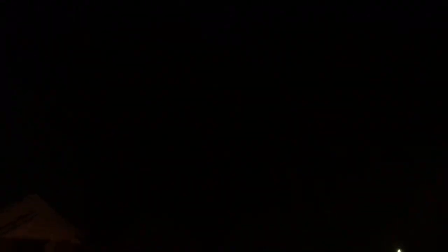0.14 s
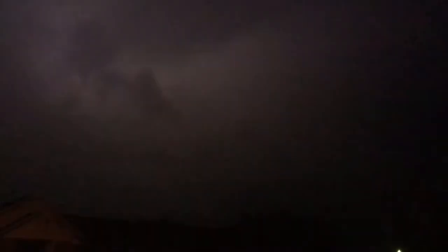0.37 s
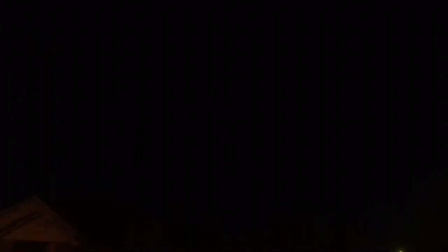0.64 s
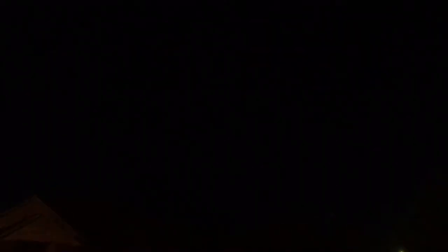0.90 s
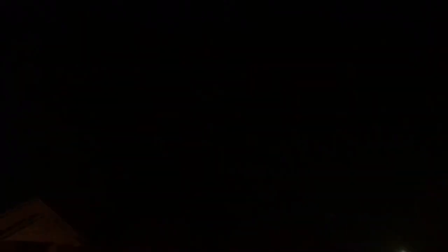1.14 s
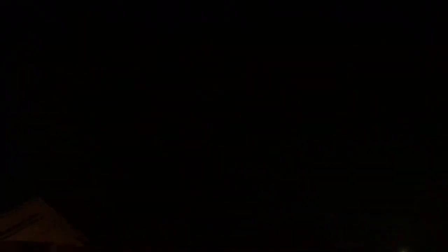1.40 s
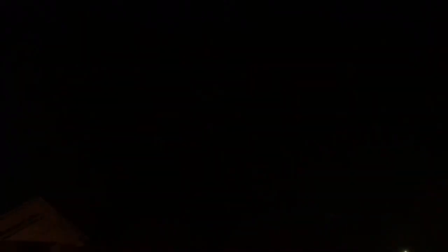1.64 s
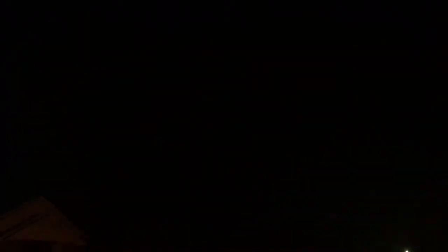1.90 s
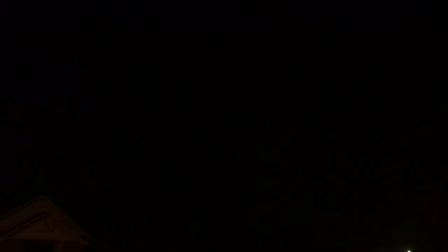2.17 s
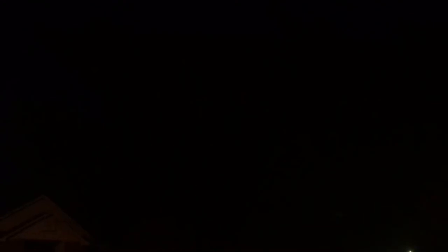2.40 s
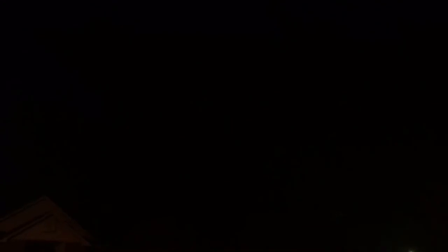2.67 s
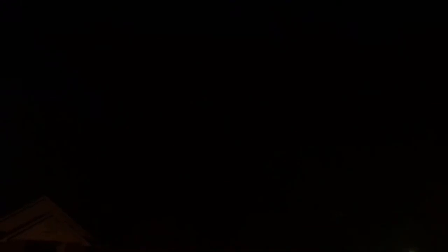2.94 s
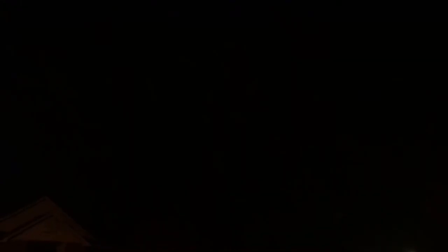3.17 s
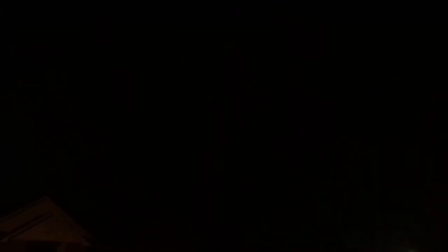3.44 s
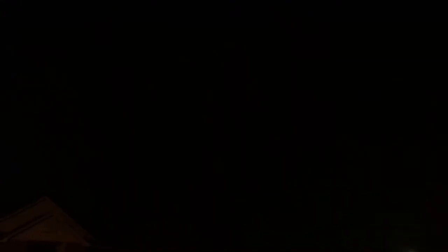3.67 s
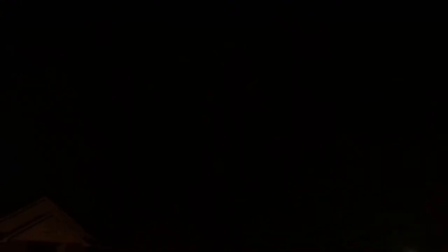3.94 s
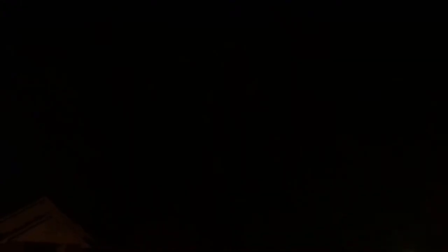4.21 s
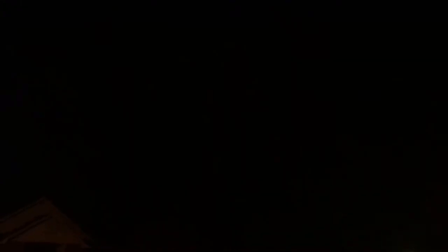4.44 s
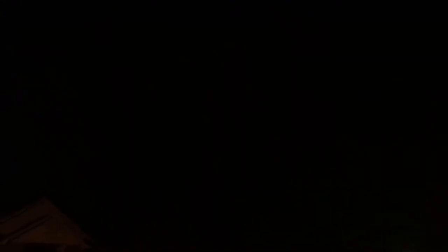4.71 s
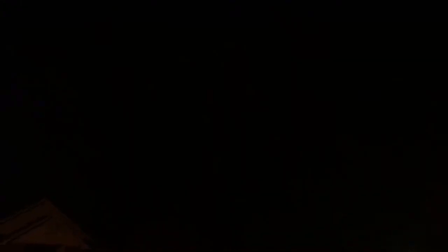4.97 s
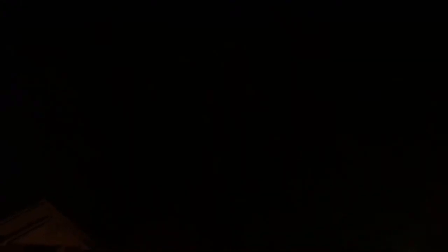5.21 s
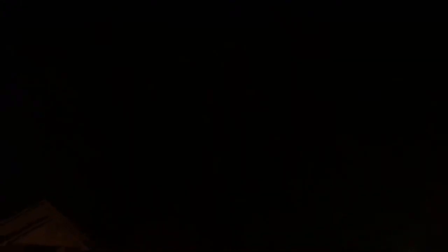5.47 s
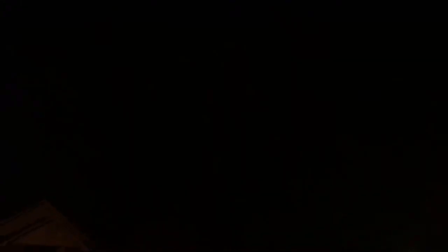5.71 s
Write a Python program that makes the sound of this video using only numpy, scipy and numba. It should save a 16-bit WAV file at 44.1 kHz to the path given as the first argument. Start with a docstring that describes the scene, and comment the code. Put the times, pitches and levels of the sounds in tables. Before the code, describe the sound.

Heard from under a porch at night, low thunder rolls without pause, made of many overlapping blunt thumps. It begins in uneven knocks, swells strongest around 3.6 seconds, then eases and lumps up again near 5.5. Beneath it lies faint rain hiss. Small drops tick close by, a big one strikes a gutter near 0.8 seconds with a short ring and splash, and tiny bubbles plink. Mono microphone, little deepest bass.

```python
"""Night thunder over light rain

Far thunder rolls over light rain, heard from under a porch roof.
Blunt shock waves from all along the bolt pile up into a rumble that the porch rings with.
A low tone wavers inside it; bands of hiss make the far rain and the thunder's airy upper fringe.
Small drops tick as noise and damped sines, and bubbles plink in a puddle as pure ringing notes.
A few big drops strike a gutter, ring its modes and splash; soft spatters gush off the roof."""
import sys
import numpy as np
from scipy import signal
from scipy.fft import rfft, irfft
from scipy.io import wavfile
from scipy.ndimage import uniform_filter1d
from numba import njit

SR = 44100
rng = np.random.default_rng(int(sys.argv[2]) if len(sys.argv) > 2 else 0)


def volts_from_db(level):
    """Convert decibel levels to linear amplitude ratios."""
    exponent = np.asarray(level, float) / 20
    return 10 ** exponent


def unload_audio(sound):
    """Save the sound as a 16-bit wav file, at the path given as the first command line argument."""
    columns = np.transpose(np.atleast_2d(sound))
    # keep every value between -1 and 1, then stretch to whole-number steps
    steps = np.round(np.clip(columns, -1, 1) * 32767)
    wavfile.write(sys.argv[1], SR, steps.astype(np.int16))


N = 257984
HZ = np.maximum(np.arange(N // 2 + 1) * SR / N, 1)  # frequency of every spectrum bin


def unit(x):
    """Scaled to rms 1."""
    return x / np.sqrt(np.mean(x ** 2))


def curves(table):
    """Every column of a table after the first (time), drawn as a line sample by sample."""
    seconds, *columns = np.transpose(table)
    return [np.interp(np.arange(N) / SR, seconds, column) for column in columns]


def filtered(x, gain):
    """Sound with its spectrum multiplied by a gain."""
    return irfft(rfft(x) * gain, N)


def shape(points):
    """Gain at every frequency, from points of frequency and level in dB."""
    hz, db = np.transpose(points)
    return volts_from_db(np.interp(np.log(HZ), np.log(hz), db))


def band(centre_hz, octaves):
    """Bell-shaped gain around a centre; octaves is its standard deviation."""
    return np.exp(-.5 * (np.log2(HZ / centre_hz) / octaves) ** 2)


def peaks(table):
    """Gain at every frequency from resonances or dips of given centre, width and dB."""
    gain = 1
    for hz, width_hz, db in table:
        bump = 1 / (1 + (2 * (HZ - hz) / width_hz) ** 2)
        gain = gain * (1 + (volts_from_db(db) - 1) * bump)
    return gain


def walk(rate_hz):
    """Smooth random curve of rms 1: held steps, averaged twice over a step's length."""
    hold = int(SR / rate_hz)
    steps = np.repeat(rng.standard_normal(N // hold + 1), hold)
    return unit(uniform_filter1d(uniform_filter1d(steps, hold), hold)[:N])


@njit
def rings(n, start, hz, t60, gain):
    """Damped sines, one per row, each stopped once it has fallen 60 dB."""
    out = np.zeros(n)
    for k in range(len(start)):
        phasor = gain[k] + 0j
        turn = np.exp((2j * np.pi * hz[k] - np.log(1000) / t60[k]) / SR)
        for i in range(start[k], min(n, start[k] + int(t60[k] * SR))):
            out[i] += phasor.imag
            phasor *= turn
    return out


def bursts(seconds, db, t60):
    """Noise that starts at once and fades for at most half a second, one burst per row."""
    envelope, noise = np.zeros(N), rng.standard_normal(N)
    for s, start_db, fade_s in zip(seconds, db, t60):
        start = int(s * SR)
        age = np.arange(N - start)[:SR // 2] / SR
        envelope[start:][:len(age)] += volts_from_db(start_db - 60 * age / max(fade_s, .002))
    return envelope * noise


# the roll as a whole; nearer stretches of the bolt are brighter:
# time_s, loudness_db, brightness_db_per_octave
ROLL = [(0, -3.5, 3), (.3, -2.5, 1), (.65, -4, 1), (.8, -2.5, 1), (1.3, -3, 0), (1.7, -0.5, 2),
        (2.3, 1.5, 0.5), (2.7, -2.5, 1), (3.2, 2, 0.5), (3.6, 5.5, -0.5), (4.0, 3.5, 0), (4.6, 0.5, 0),
        (5.2, -0.5, 0), (5.55, -1, 1), (5.85, 0.5, 0.5)]
# sizes of wave, deepest to smallest: centre_hz, level_db, random_swell_db
WAVE_SIZES = [(50, -49.5, -0.5), (90, -42, 1), (150, -44.5, 1.5), (222, -52.5, 1.5), (310, -57, 2.14),
              (420, -61, 2), (676, -64, 1.5)]
# peals that stand out of the roll: peak_s, lift_db, wave_hz, rise_and_fall_s
PEALS = [(0.089, 8.5, 150, 0.013), (0.04, 4, 367, 0.062), (0.342, 12, 268, 0.035), (0.705, 9, 373, 0.038),
         (0.964, 5, 358, 0.046), (0.346, 7.5, 71.6, 0.23), (0.548, 6.5, 260, 0.032),
         (0.743, 13.5, 150, 0.025), (0.876, 10.5, 90, 0.27), (1.01, 6.5, 283, 0.054),
         (1.057, 9.5, 181, 0.06), (1.227, 9.5, 150, 0.084), (1.25, 1, 50, 0.028), (1.206, 1.5, 325, 0.067),
         (1.39, 9, 90, 0.088), (1.451, 18, 198, 0.01), (1.59, 10, 173, 0.02), (1.556, 5, 267, 0.24),
         (1.698, 7.5, 90, 0.027), (1.743, 10, 500, 0.015), (1.797, 12.5, 102, 0.049), (1.912, 7, 84, 0.018),
         (2.073, 7, 90, 0.027), (2.075, 12, 243, 0.016), (2.175, 6, 55, .08), (2.3, 2.5, 171, 0.044),
         (2.402, 9, 257, 0.06), (2.395, 7.5, 560, 0.034), (2.0, 2.5, 805, 0.45), (2.65, 3, 80, 0.16),
         (2.999, 10, 110, 0.033), (3.527, 7.5, 150, 0.063), (3.63, 5, 50, 0.048), (3.614, 7, 300, 0.064),
         (3.33, 4.5, 325, 0.055), (3.726, 0, 90, 0.06), (3.883, 8, 55.4, 0.024), (3.903, 5, 250, 0.032),
         (4.046, 4, 90, 0.089), (4.315, 13, 80, 0.04), (4.562, 11.5, 150, 0.0086), (4.738, 8, 90, 0.028),
         (4.908, 6.5, 208, 0.099), (4.955, 10, 119, 0.022), (5.393, 1.5, 159, 0.054),
         (5.523, 15.5, 222, 0.036), (5.615, 12, 240, 0.023), (5.576, 8, 403, 0.037), (5.62, 9, 90, 0.026),
         (5.688, 3, 150, 0.083), (5.788, 8, 90, 0.021)]


def wave_levels(pivot_hz=90, peal_octaves=0.37):
    """Level of each wave size: the roll tilted by brightness, peals near that size, random lumps."""
    t = np.arange(N) / SR
    coarse = t[::64]
    loud_db, bright_db = curves(ROLL)
    peak_s, peal_db, wave_hz, length_s = np.transpose(PEALS)
    swells = np.exp(-np.abs(coarse - peak_s[:, None]) / length_s[:, None])
    for hz, db, lumps_db in WAVE_SIZES:
        lift_db = peal_db * np.exp(-.5 * (np.log2(hz / wave_hz) / peal_octaves) ** 2)
        peals_db = np.interp(t, coarse, lift_db @ swells)
        tilt_db = bright_db * np.log2(hz / pivot_hz)
        yield db + loud_db + tilt_db + peals_db + lumps_db * walk(17)


# borders between neighbouring sizes of wave: border_hz
BORDERS_HZ = (0, 70, 115, 190, 260, 340, 540, 30000)
# colour of the thunder within each size of wave: frequency_hz, relative_level_db_per_hz
THUNDER_COLOUR = [(14, -37), (24, -9), (49, -2), (85, -1), (101, 1), (156, -6), (186, -15.5), (222, -19.5),
                  (401, -23), (1100, -42), (1430, -47.5), (2420, -120)]
# air resonances of the porch: centre_hz, width_hz, boost_db
PORCH = [(76.5, 1.3, 8.5), (100.5, 4.4, -0.5), (124, 18, 1.5), (148, 10, 2.5), (167.5, 3.6, 5),
         (213.3, 15, 7.5), (240, 2.6, 6), (289.7, 21, 5.5), (364.7, 11.6, 7), (419, 15, 0.5), (489, 16, 8),
         (975, 13, 9)]


def thunder(shocks_per_s=1500., spread_db=1.5, even_s=0.11):
    """Shock waves of uneven size arrive at random; each size of wave swells on its own."""
    colour, porch = shape(THUNDER_COLOUR), peaks(PORCH)
    out = 0
    for low_hz, high_hz, db in zip(BORDERS_HZ, BORDERS_HZ[1:], wave_levels()):
        size = 1 / np.sqrt((1 + (low_hz / HZ) ** 12) * (1 + (HZ / high_hz) ** 12))
        arrivals = (rng.random(N) < shocks_per_s / SR) * rng.choice([-1, 1], N)
        shocks = arrivals * volts_from_db(spread_db * rng.exponential(size=N))
        waves = filtered(shocks, colour * size)
        # countless echoes off ground and cloud even out the level from moment to moment
        local_rms = np.sqrt(uniform_filter1d(waves ** 2, int(even_s * SR)))
        out = out + volts_from_db(db) * unit(filtered(waves / local_rms, size * porch))
    return out


# low tone inside the rumble: time_s, pitch_hz, rms_level_db
HUM = [(0, 100, -45), (1.19, 98.8, -44), (1.3, 98.5, -45.5), (2.39, 97.7, -39), (3.03, 99.56, -39),
       (3.22, 103.5, -61), (3.45, 98.37, -37.5), (5.3, 104.4, -50.5), (5.54, 88.87, -35.5),
       (5.85, 101, -53.5)]


def hum(waver_db=1.5, waver_hz=2.118):
    """A low sine inside the rumble that wavers in level and pitch."""
    hz, db = curves(HUM)
    hz = hz + waver_hz * walk(6)
    level = np.sqrt(2) * volts_from_db(db + waver_db * walk(8))
    return level * np.sin(2 * np.pi * np.cumsum(hz) / SR)


# far rain, before the hiss trim: time_s, level_db
RAIN = [(0.0, -66.5), (0.57, -67), (1.02, -64.5), (1.32, -66), (3.01, -65.5), (3.34, -65), (4.07, -65),
        (4.43, -66), (5.85, -65.5)]
# colour of the hiss and the low wash: frequency_hz, relative_level_db_per_hz
HISS_COLOUR = [(240, -21.5), (400, -1.5), (874, -8), (944, -9), (1450, -12), (3640, -22), (4870, -25),
               (6120, -24), (7590, -30), (9260, -29.5), (11000, -30.5), (14400, -33.5), (15100, -26),
               (15900, -34)]
FIZZ_SWING = 1.15  # the high fizz and small drops swing this much more than the hiss


def far_rain_and_wash(hiss_db=-1.0, shared_db=0.46, flicker_db=1.5, drift_db=-0.06, wash_follow=0.52):
    """Half-octave noise bands swell together and flicker alone: rain hiss over a low wash.

    The low wash is the thunder's airy upper fringe, louder when the roll is bright."""
    rain_db, = curves(RAIN)
    gust_db = rain_db - rain_db.mean()
    wash_db = drift_db * walk(2.82) + wash_follow * curves(ROLL)[-1]
    colour, swell = shape(HISS_COLOUR), walk(20.86)
    scale = np.sqrt(np.mean(colour ** 2 * (HZ > 1300) * (HZ < 4000)))
    out = 0
    for hz in 300 * 2 ** np.arange(0, 6.1, .5):
        if hz < 1300:
            db = wash_db
        elif hz < 4000:
            db = gust_db
        else:
            db = FIZZ_SWING * gust_db
        hiss = filtered(rng.standard_normal(N), colour * band(hz, .25))
        out = out + hiss * volts_from_db(db + shared_db * swell + flicker_db * walk(20))
    return out / scale * volts_from_db(rain_db.mean() + hiss_db)


def patter(count=2200, base_db=-58.5, range_db=14.0, cycles_per_20_db=1.34, low_hz=5500.,
           octaves=1.33, echo_db=-22.5, echo_s=0.02):
    """Countless small drops in flurries: short ticks, most faint, a few clear, smeared by nearby walls."""
    when, pitch, size = rng.random((count, 3)).T
    start = (when * N).astype(int)
    hz = low_hz * 2 ** (octaves * np.sqrt(pitch))
    rain_db, = curves(RAIN)
    flurry_db = 1.8 * walk(16) + FIZZ_SWING * (rain_db - rain_db.mean())
    db = base_db + range_db * size ** 4 + flurry_db[start]
    ticks = rings(N, start, np.minimum(hz, 16000), cycles_per_20_db * 3 / hz, volts_from_db(db))
    walls = bursts([.002], [echo_db], [echo_s])
    return ticks + filtered(ticks, rfft(walls))


# near drops; each part of the sound is trimmed from level_db:
# listed_s, level_db, ring_hz, tick_over_level_db
DROPS = [(0.0376, -53, 6300, -6.5), (0.0907, -56.5, 5490, -10), (0.1276, -58, 4700, -13),
         (0.196, -50, 5730, -15.5), (0.2344, -51, 5800, -18), (0.3491, -56, 5750, -13),
         (0.4838, -53, 5700, -23), (0.5292, -57, 4540, -7), (0.5626, -58, 5010, -4),
         (0.5723, -51, 6270, -12), (0.656, -50, 9360, -15), (0.6918, -55, 9000, -12),
         (0.7911, -51, 5360, -11), (0.8026, -55, 6280, -12), (0.807, -39.5, 6000, -24),
         (0.8185, -56, 6000, -10), (0.853, -53, 6000, -16), (0.8665, -48, 8600, -20),
         (0.8768, -41, 5330, -9.5), (0.8815, -51, 9600, -16), (1.0919, -49, 5420, -12),
         (1.1413, -47, 6760, -12), (1.1483, -56, 6960, -12), (1.1636, -58, 6330, -4),
         (1.1917, -60, 4640, -11), (1.4516, -50.5, 9510, -11), (1.529, -60, 9000, -13),
         (1.647, -63, 8900, -12), (1.71, -63, 9500, -12), (1.808, -48.5, 5960, -11),
         (1.8642, -57, 6930, -17), (1.8906, -62, 5670, -17), (1.9889, -58, 9910, -11),
         (2.035, -60, 8000, -8), (2.0664, -51, 5930, -15), (2.165, -57, 9000, -17), (2.19, -49, 7500, -17),
         (2.2079, -46, 9500, -14), (2.2625, -53, 7000, -20), (2.409, -63, 9000, -10),
         (2.4163, -45.5, 6190, -20), (2.429, -57, 9000, -12), (2.438, -60, 9000, -8),
         (2.48, -55, 6000, -25), (2.5147, -58, 5450, -9), (2.584, -54, 5750, -9), (2.6271, -56, 4500, -20),
         (2.6593, -43.5, 8200, -17), (2.818, -58, 11000, -10), (2.8341, -56, 6000, -16),
         (2.8784, -54, 6030, -12), (2.9006, -50, 5990, -10), (2.9427, -61, 11500, -9),
         (2.9966, -50, 6000, -18), (3.117, -50, 8800, -15), (3.1584, -46, 5800, -27),
         (3.1773, -52, 8500, -16), (3.2345, -53, 6920, -10), (3.267, -51, 9170, -18),
         (3.2971, -50, 6400, -16), (3.3528, -51, 7000, -16), (3.3734, -49, 4300, -26),
         (3.4286, -42.5, 7400, -14), (3.4901, -51, 6500, -16), (3.5618, -53, 6510, -24),
         (3.591, -45.5, 6290, -26), (3.683, -48, 7150, -19), (3.724, -50, 4200, -26),
         (3.7389, -50, 6800, -20), (3.802, -46.5, 6760, -14), (3.823, -48, 6800, -20),
         (3.8541, -52, 9400, -10), (3.8756, -49, 6100, -13), (3.8831, -54, 8000, -11),
         (3.896, -48, 8000, -18), (3.9744, -50, 6040, -14), (3.9973, -49, 7200, -20),
         (4.0537, -54, 5710, -10), (4.277, -51, 8500, -21), (4.358, -52.5, 6140, -9),
         (4.418, -60, 5330, -7), (4.5351, -57, 8000, -10), (4.5984, -53, 9300, -17),
         (4.6119, -52, 8000, -10), (4.644, -47.5, 8620, -15), (4.647, -56, 9000, -8),
         (4.7012, -64, 9000, -11), (4.7455, -51, 5500, -24), (4.7566, -48, 7500, -14),
         (4.763, -47, 7000, -20), (4.7805, -51, 9600, -15), (4.8614, -45, 6010, -18),
         (4.9156, -50, 5910, -15), (4.9347, -42, 11000, -12.5), (4.9641, -55, 7140, -13),
         (4.969, -56, 7200, -24), (5.1402, -53, 7500, -10), (5.168, -48, 6630, -17),
         (5.1761, -53, 9000, -10), (5.275, -44.5, 6440, -30), (5.2894, -62, 8000, -11),
         (5.3295, -55, 5290, -10), (5.415, -50, 5600, -18), (5.4505, -52, 5500, -24),
         (5.4615, -55, 6000, -23), (5.479, -55, 7000, -18), (5.5184, -59, 7000, -8),
         (5.519, -43, 4730, -26), (5.677, -50, 6300, -11), (5.7523, -49, 4750, -19),
         (5.7598, -53, 8000, -12), (5.7783, -45.5, 9400, -17)]


def drops(ring_db=-3.0, ring_cycles_per_20_db=7.4, tick_db=11.5, tick_s=0.0056, spray_db=-15.5,
          spray_s=0.075, click_db=-3.0, click_hz=15200., click_s=0.0018, wet_db=-15.0, tail_s=0.075):
    """A bright tick of impact with its spray, a short ring of what is struck, then a faint wet tail."""
    s, db, hz, bright_db = np.transpose(DROPS)
    s = s + 0.00072  # seconds: every near drop sounds this long after its listed time
    start, each = (s * SR).astype(int), np.ones(len(s))
    ring = rings(N, start, hz, ring_cycles_per_20_db * 3 / hz, volts_from_db(db + ring_db))
    snap_db = db + bright_db + tick_db
    snap = bursts(s, snap_db, tick_s * each)
    spray = bursts(s, snap_db + spray_db, spray_s * each)
    tick = filtered(snap + spray, band(11400.0, 0.43))
    click = rings(N, start, click_hz * each, click_s * each, volts_from_db(snap_db + click_db))
    tail = filtered(bursts(s, db + wet_db, tail_s * each), band(4840.0, 0.85))
    return ring + click + tick + tail


# clear drips into a puddle: start_s, level_db, pitch_hz, cycles_to_fall_60_db
PLINKS = [(.878, -56, 5520, 220), (.904, -60, 7500, 45), (1.733, -62, 3100, 45), (1.737, -58, 6200, 45),
          (1.747, -55, 2440, 45), (2.585, -54, 5750, 45), (2.66, -55, 2830, 45), (2.698, -57, 2800, 45),
          (3.014, -57, 3700, 45), (3.167, -57, 3030, 45), (3.217, -56, 6600, 60), (3.505, -56, 2900, 45),
          (3.823, -53.5, 3090, 30), (3.895, -54, 6000, 45), (3.977, -55, 6100, 70), (4.056, -58, 4300, 80),
          (4.112, -57, 4400, 45), (4.117, -55, 2700, 15), (4.746, -55, 3600, 45), (4.862, -56, 5900, 45),
          (5.277, -45, 2130, 45), (5.277, -49, 3550, 18), (5.31, -57, 3300, 45), (5.523, -53, 2180, 45),
          (5.522, -53, 3100, 20)]


def plinks(count=260, cycles=59.0, faint_db=-68.0, range_db=10.5, low_hz=1498.0, octaves=1.784,
           slope_db=2.0):
    """Trapped bubbles ring clear, short notes; many fainter ones fall at random, weaker when higher."""
    when, size, pitch = rng.random((count, 3)).T
    level_db = faint_db + range_db * size ** 2 - slope_db * octaves * pitch
    pitch_hz = low_hz * 2 ** (octaves * pitch)
    faint = (when * N / SR, level_db, pitch_hz, np.full(count, cycles))
    s, db, hz, turns = np.hstack([np.transpose(PLINKS), faint])
    return rings(N, (s * SR).astype(int), hz, turns / hz, volts_from_db(db))


# soft spatters off the roof; length is two standard deviations of the swell:
# peak_s, level_db, length_s, centre_hz
SPATTERS = [(0.786, -60, 0.016, 2200), (0.848, -68, 0.047, 2800), (1.742, -59, 0.029, 1290)]


def spatter():
    """Brief gushes of water: bands of noise that rise and fall smoothly."""
    t, out = np.arange(N) / SR, 0
    for s, db, length_s, hz in SPATTERS:
        gush = unit(filtered(rng.standard_normal(N), band(hz, 1.0)))
        out = out + gush * volts_from_db(db) * np.exp(-.5 * ((t - s) / (length_s / 2)) ** 2)
    return out


# big drops on the gutter: start_s, ring_db, splash_db, splash_t60_s, splash_hz
BLOWS = [(.7922, -40, -44.5, 0.32, 2500), (.8, -53, -43, 0.29, 1000), (0.797, -55, -55, 0.1, 6500),
         (0.8025, -47.5, -51.5, 0.089, 8000), (0.813, -58, -48, 0.048, 1200), (0.835, -58, -65, 0.03, 2500),
         (0.877, -58, -59, 0.36, 5630), (1.187, -60, -49, 0.024, 2780), (5.2758, -64, -40.5, 0.072, 1860),
         (5.5205, -68, -51, 0.04, 3600)]
# ringing modes of the gutter: mode_hz, level_over_ring_db, t60_s
GUTTER_MODES = [(675, -15, 0.23), (1042, -16, 0.13), (1466, -17, 0.17), (2170, -13, 0.036),
                (2500, -13, 0.065), (2878, 0.5, 0.035), (4240, -18.5, 0.1), (5500, -29, 0.048)]


def gutter(thud_hz=730., thud_over_splash_db=7, thud_s=0.0053, splash_octaves=0.92):
    """Each big drop thuds, rings the gutter's modes and bursts into a splash of its own colour."""
    s, ring_db, splash_db, splash_s, splash_hz = np.transpose(BLOWS)
    mode_hz, mode_db, t60 = np.transpose(GUTTER_MODES)
    start, each = (s * SR).astype(int), np.ones(len(s))
    # every blow excites every mode
    rows = np.broadcast_arrays(start[:, None], mode_hz, t60, volts_from_db(ring_db[:, None] + mode_db))
    out = rings(N, *(np.ravel(row).copy() for row in rows))
    out = out + rings(N, start, thud_hz * each, thud_s * each, volts_from_db(splash_db + thud_over_splash_db))
    for k, hz in enumerate(splash_hz):
        splash = bursts(s[[k]], splash_db[[k]], splash_s[[k]])
        out = out + filtered(splash, band(hz, splash_octaves) * np.sqrt(hz / HZ))
    return out


def scene():
    """Thunder over rain; small drops are too light to move much air below the treble."""
    treble = 1 / np.sqrt(1 + (4000.0 / HZ) ** 6)
    small = filtered(patter() + drops(), treble)
    mix = thunder() + hum() + far_rain_and_wash() + small + plinks() + spatter() + gutter()
    return mix[None]


def low_pass(x):
    """Removes everything above the highest recorded frequency."""
    return signal.sosfilt(signal.butter(12, 16820, fs=SR, output="sos"), x)


# dips from the microphone's housing: centre_hz, width_hz, dip_db
HOUSING_DIPS = [(4870, 510, -5), (10420, 600, -4.5)]


def record(dry, bass_hz=33, top_hz=15770):
    """The microphone drops the deepest bass, its housing notches the treble, and the top is cut off."""
    bass_cut = 1 / np.sqrt(1 + (bass_hz / HZ) ** 8)
    top_cut = 1 / np.sqrt(1 + (HZ / top_hz) ** 200)
    mix = filtered(dry, bass_cut * top_cut * peaks(HOUSING_DIPS))
    return low_pass(mix)


dry = scene()
out = record(dry)
unload_audio(out)
```